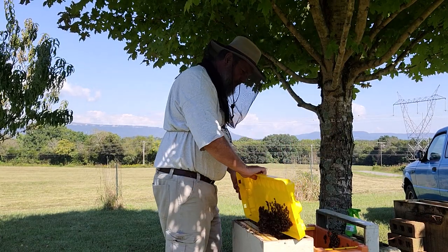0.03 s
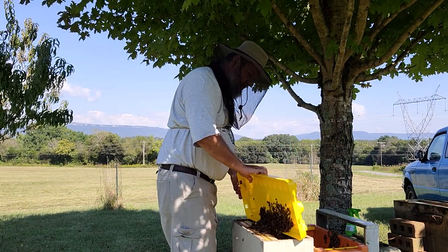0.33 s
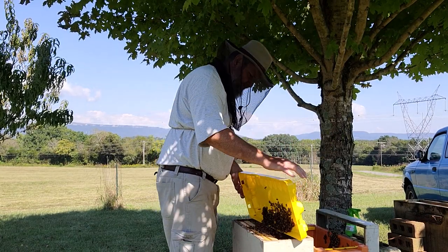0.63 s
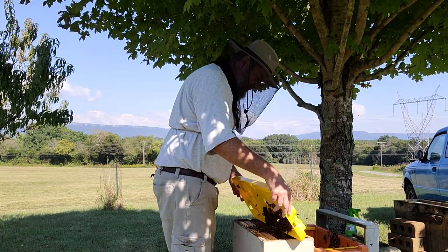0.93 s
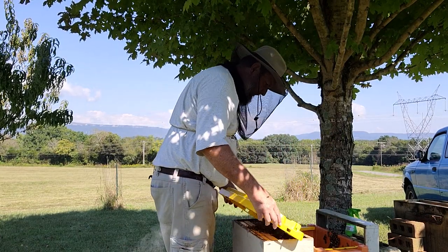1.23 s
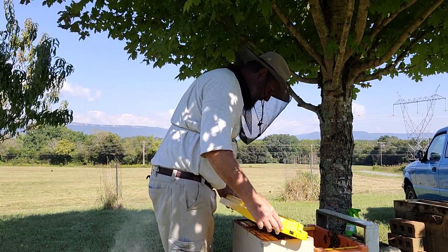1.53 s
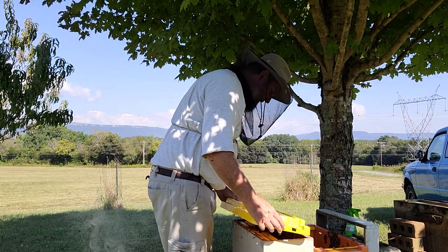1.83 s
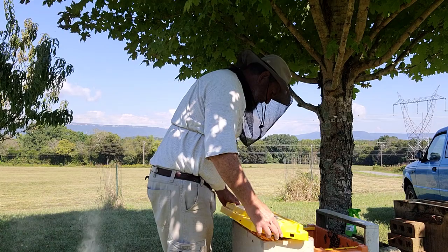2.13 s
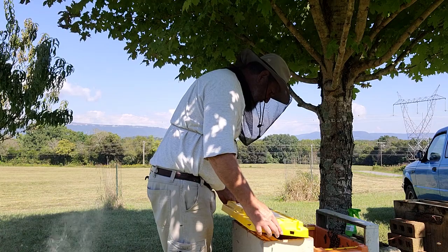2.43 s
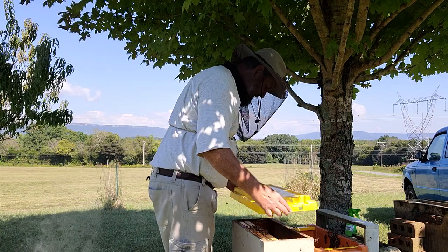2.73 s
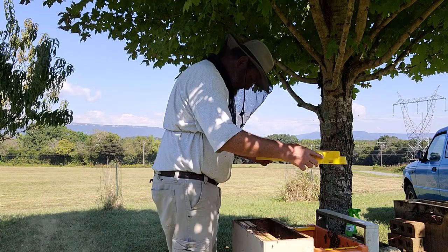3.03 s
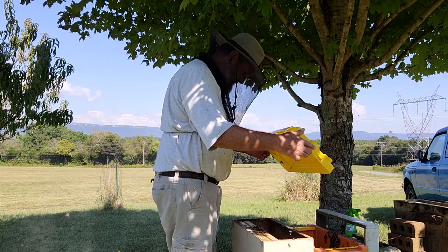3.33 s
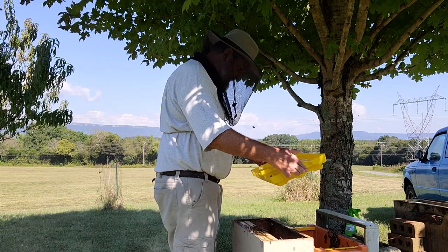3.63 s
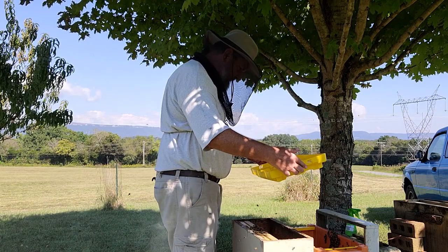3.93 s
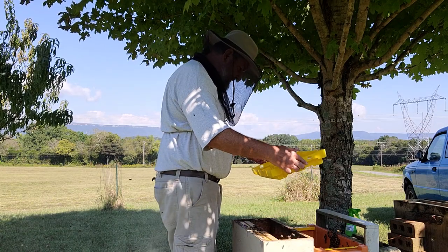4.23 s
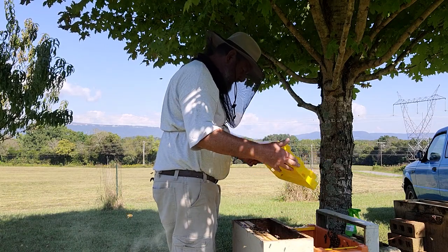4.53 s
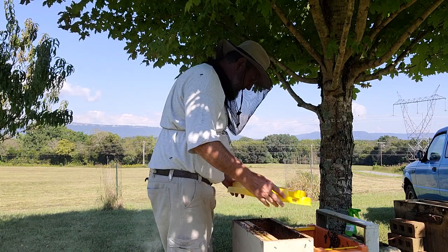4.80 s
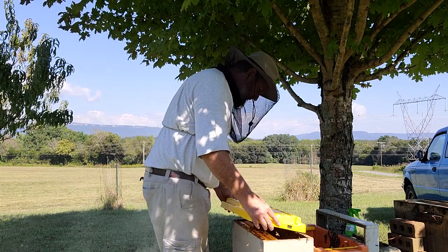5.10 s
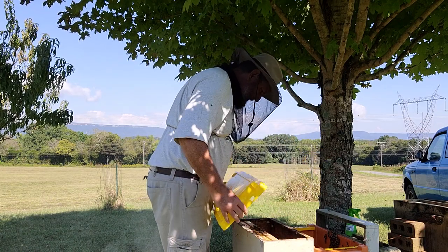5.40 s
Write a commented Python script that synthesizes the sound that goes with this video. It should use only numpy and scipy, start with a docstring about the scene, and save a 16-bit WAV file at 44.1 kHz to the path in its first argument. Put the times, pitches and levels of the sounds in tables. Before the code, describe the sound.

A hand rustles over a plastic lid, which rubs and taps softly on a wooden box close by. Then comes a loud, hollow knock with a brief rattle, a short scrape and a squeak. About three seconds later a second sharp knock lands. Behind it all, in the open air, are faint high insect trills, scattered falling bird chirps and the low throb of a far engine.

```python
"""Under a tree, a far engine throbs and insects trill in the open air from start to end.
First a hand rustles over a plastic lid, which clicks, scuffs and taps on a wooden hive box; birds join in.
Just after 2 s the lid is knocked down to shake off bees: a quick run of hits that rings lid and box.
The rim drags and squeaks once, then come a few more faint chirps and light scuffs.
Just after 5 s the lid is knocked down again, this time on its corner."""
import sys
import numpy as np
from scipy import signal
from scipy.fft import rfft, irfft, next_fast_len
from scipy.io import wavfile

SR = 44100
rng = np.random.default_rng(int(sys.argv[2]) if len(sys.argv) > 2 else 0)


def generate_wav(sig):
    """Save sig (samples, or channels by samples) to the path in sys.argv[1] as 16-bit PCM at SR."""
    pcm = np.round(np.clip(np.atleast_2d(sig).T, -1, 1) * 32767).astype(np.int16)
    wavfile.write(sys.argv[1], SR, pcm)


N = 245195
TIME = np.arange(N) / SR

# the knocks: t/s, force/dB, place (0 rim, 1 corner), edge hardness/Hz, wait until the slap/s,
# snap level/dB, wait from slap to thud/s, thud level/dB, bounce level/dB
KNOCKS = [(2.2302, 0.5, 0.072, 2880, .0081, -29, .0174, -7, -11),
          (5.1674, 0, 0.96, 5200, .0053, -25, 0.00349, -1, -46)]
# the notes lid and box ring at: f/Hz, ring time/s (to fade by 60 dB), rim level/dB, corner level/dB
LID_NOTES = [(93.6, 0.35, -21, -25.5), (115, 0.095, -22.5, -15.5), (154, 0.084, -40, -14),
             (198, 0.079, -20, -18.5), (238.2, 0.132, -23, -13), (274.7, 0.15, -30, -19),
             (311, 0.078, -20.5, -27), (401, 0.1, -27, -27.5), (439.5, 0.084, -29.5, -18),
             (444.2, 0.23, -20, -57), (683, 0.1, -24.5, -32), (734, 0.073, -36.5, -22),
             (918, 0.056, -29, -35), (970, 0.066, -39, -20), (1035, 0.028, -27, -25),
             (1221, 0.041, -21, -22), (1396, 0.073, -26, -35), (1430, 0.026, -39, -47),
             (1768, 0.031, -38, -16.5), (1952, 0.023, -13.5, -61), (2220, 0.061, -61, -16),
             (2350, 0.073, -37, -36), (2613, 0.083, -31, -17.5), (2930, 0.067, -46, -21),
             (3055, 0.065, -36, -30), (3323, 0.026, -36, -14.5), (3427, 0.073, -48, -27),
             (3765, 0.049, -57, -20.5)]
# the crack, a crowd of short notes too close to tell apart: f/Hz, level/dB
CRACK_SHAPE = [(100, -8.5), (300, 6.5), (550, -1), (800, 5), (1500, 1.5), (3300, 2), (4200, -10),
               (5500, -11), (6800, -5.5), (8200, -18), (9600, -24), (12000, -10.5), (15500, -5.5)]
# how long the crack lasts: f/Hz, ring time/s
CRACK_FADE = [(200, 0.18), (1000, 0.094), (3000, 0.05), (7000, 0.13), (15000, 0.055)]
# the lid rubbing on the wood: middle t/s, length/s, level/dB, treble cut-off f/Hz
SCUFFS = [(0.306, .12, -49, 2920), (0.459, 0.28, -57, 2480), (0.595, 0.086, -49, 1510),
          (1.0, .06, -56, 1598), (1.416, .05, -52, 1360), (1.69, 0.19, -53.5, 1900),
          (2.305, .06, -48, 7000), (2.37, .09, -49.5, 2500), (2.6, .05, -55, 2500),
          (3.45, 0.075, -58, 3483), (4.65, 0.038, -54, 7100)]
# light taps as the lid is shifted: t/s, force/dB, treble cut-off f/Hz
TAPS = [(.985, -24, 950), (1, -28.5, 1200), (1.401, -26.5, 1600), (1.42, -25, 1000), (1.619, -24.5, 1180),
        (1.642, -31, 3000), (1.671, -29, 1800), (1.757, -27.5, 1300)]
# the plastic clicking under the hand: t/s, level/dB, middle f/Hz, half width/octaves
CLICKS = [(.1000, -32.5, 3180, 0.87), (1.416, -37, 3400, 0.45)]
# how fast the engine cycles: t/s, f/Hz
ENGINE_RATE = [(0.0, 16.4), (0.59, 16.06), (1.55, 16.9), (2.14, 15.9), (2.63, 16.5), (3.11, 16.7),
               (3.42, 16.65), (5.56, 16.64)]
# the tones in its hum: multiple of the cycle rate, level/dB
ENGINE_TONES = [(2, -58.5), (3, -56), (4, -53.5), (5, -41.5), (6, -50.5), (7, -55.5), (8, -54), (9, -61.5),
                (11, -66), (12, -70.5)]
# steady insects: f/Hz, width/Hz, level/dB, pulse rate/Hz, left minus right/dB
TRILLS = [(6210, 52, -72, 60, -10.5), (6160, 770, -67, 31, -4), (7100, 33, -72, 99, -6),
          (7044, 540, -64, 34, 0.5)]
# insects whose pitch arches in each pulse: top f/Hz, bend/Hz, place of the top (0 to 1), width/Hz,
# level/dB, pulse rate/Hz, shortness of the pulse, left minus right/dB
PULSERS = [(8366, 2600, 0.6, 150, -70, 17.9, 2.5, 13.5), (8000, 2500, 0.4, 130, -69.5, 16.9, 4.5, 11.5),
           (6210, 1600, 0, 200, -74.5, 4.4, 8.7, -12.5)]
# falling bird chirps: t/s, start f/Hz, end f/Hz, level/dB
CHIRPS = [(1.063, 3950, 2560, -62), (1.143, 3600, 2710, -65.5), (1.457, 3400, 2540, -63.5),
          (1.532, 3400, 2380, -62), (1.907, 3500, 2450, -59.5), (1.946, 2950, 2290, -56.5),
          (2.689, 3950, 3140, -52.5), (3.073, 2750, 2180, -62), (3.253, 3050, 2500, -60),
          (4.017, 3400, 2920, -56)]
# high peeps that lead into some chirps: t/s, f/Hz, level/dB
PEEPS = [(1.497, 3620, -60), (1.85, 3560, -59), (1.932, 3850, -60)]
# the low wash of open air: f/Hz, level/dB
WASH_SHAPE = [(20, -18), (33, -2.5), (60, 4), (110, -2.5), (170, -8.5), (260, -12), (450, -14),
              (700, -18.5), (1250, -18.5), (2000, -24.5), (3200, -27), (5000, -30.5), (8500, -27.5),
              (9200, -38.5), (16000, -59)]
# the thin hiss above it: f/Hz, level/dB
HISS_SHAPE = [(9000, -14), (11000, -10), (12300, -3), (15800, -1.5)]
# how alike the wash is in the two ears: f/Hz, likeness (0 unrelated, 1 the same)
EAR_LIKENESS = [(30, 0.51), (90, 0.92), (300, 1), (640, 0.25), (1400, 0.18), (7000, 0.15), (15000, 0)]
# the lean of hive, engine and air to the right: f/Hz, left minus right/dB
BALANCE = [(60, -1.47), (300, -0.5), (2400, -1), (4400, -3.5), (8000, -3), (15000, -7)]


def knocks(seat_s=0.002788, snap_lag_s=0.00035, hop_s=0.042, hop_kept=0.52, hop_loss_db=9.5):
    """The lid lands edge first, slaps flat, takes the weight of the arm and bounces three times."""
    out = np.zeros((2, N))
    for s, force_db, place, edge_hz, slap_s, snap_db, thud_s, thud_db, bounce_db in KNOCKS:
        force, flat_at = amp(force_db), s + slap_s
        touch = contact(place, force_db=0, hard_hz=2 * edge_hz, hold=0.8758, crack_db=-15.5)
        add(out, s, force * touch)
        rest_of_edge = contact(place, force_db=4, hard_hz=edge_hz / 2, hold=0.93, crack_db=-23.5)
        add(out, s + seat_s, force * rest_of_edge)
        slap = contact(place, force_db=0.5, hard_hz=6398, hold=0.9256, crack_db=-15.5)
        add(out, flat_at, force * slap)
        add(out, flat_at + snap_lag_s, force * amp(snap_db) * snap(hz=14600, octaves=0.42))
        thud = contact(place, force_db=thud_db + 2.5, hard_hz=1052, hold=0.39, crack_db=-16)
        add(out, flat_at + thud_s, force * thud)
        hops_s = hop_s * hop_kept ** np.arange(3)  # each hop is shorter and weaker
        for k, lag in enumerate(np.cumsum(hops_s)):
            bounce = contact(place, force_db=bounce_db - 4, hard_hz=948, hold=1.04, crack_db=-10.5)
            add(out, flat_at + lag, force * amp(-k * hop_loss_db) * bounce)
    return out


def contact(place, force_db, hard_hz, hold, crack_db, spread=0.39, tick_s=0.0012):
    """One hit makes a ring and a crack. A harder hit keeps more treble; hold scales the ring times."""
    fade = np.array(CRACK_FADE) * [1, hold]
    side_shape = [(hz, db + 10 * np.log10(hz / 3000)) for hz, db in CRACK_SHAPE]
    middle = fading_noise(CRACK_SHAPE, fade)[0]
    side = spread * fading_noise(side_shape, fade)[0]  # the ears differ more in the treble
    tick = 1 + 0.46 * np.exp(-np.arange(len(middle)) / SR / tick_s)  # the first instant stands out
    crack = amp(crack_db) * tick * np.array([middle + side, middle - side])
    return amp(force_db) * soften(ring(place, hold) + crack, hard_hz)


def ring(place, hold, rise_cycles=0.56):
    """Lid and box ring at their own notes; where they are hit sets how loud each note is."""
    t = np.arange(8192) / SR
    out = np.zeros((2, len(t)))
    for k, (hz, ring_s, rim_db, corner_db) in enumerate(LID_NOTES):
        gain = (-1) ** k * amp(rim_db + place * (corner_db - rim_db))
        swing = (1 - np.exp(-t * hz / rise_cycles)) * fade_out(t, ring_s * hold)
        skew = amp(-17) * hz / 1000 * rng.standard_normal((2, 1))  # high notes reach the ears out of step
        out += gain * swing * np.sin(2 * np.pi * hz * t + skew)
    return out


def snap(hz, octaves, ring_s=0.0072):
    """The plastic snaps: a very short burst of noise around one pitch."""
    t = np.arange(1024) / SR
    noise = rng.standard_normal((2, len(t)))
    band = colour(noise, lambda f: np.exp(-.5 * (np.log2((f + 1) / hz) / octaves) ** 2))
    return unit_level(band) * (1 - np.exp(-t * hz)) * fade_out(t, ring_s)


def taps():
    """Handling the lid makes soft hits on the box and small clicks in the plastic."""
    out = np.zeros((2, N))
    for s, force_db, hard_hz in TAPS:
        add(out, s, contact(place=0.44, force_db=force_db, hard_hz=hard_hz, hold=0.63, crack_db=-16))
    for s, db, hz, octaves in CLICKS:
        add(out, s, amp(db) * snap(hz, octaves))
    return out


def scuffs(slips_per_s=400, box_hz=450, bass_cut_hz=330):
    """Tiny slips of the rim on the wood ring the lid and set the hollow box humming; one drag squeaks."""
    out, t = np.zeros((2, N)), np.arange(8192) / SR
    box_note = amp(3.5) * unit_level(np.sin(2 * np.pi * box_hz * t) * fade_out(t, ring_s=0.2))
    for s, length, db, bright_hz in SCUFFS:
        size = int(length * SR) + 2
        slips = rng.standard_normal(size) * np.hanning(size)
        slips *= 0.13 + (rng.random(size) < slips_per_s / SR)  # a soft rub with sudden catches
        notes = unit_level(ring(place=0, hold=1))
        grit = amp(1) * unit_level(fading_noise(CRACK_SHAPE, CRACK_FADE))
        rub = soften(signal.fftconvolve(slips[None], box_note + notes + grit, axes=1), bright_hz)
        # light slips hardly move the lowest notes
        rub = colour(rub, lambda f: f ** 2 / np.hypot(f ** 2, bass_cut_hz ** 2))
        add(out, s - length / 2, amp(db) * rub / np.sqrt(np.sum(rub ** 2) / size))
    squeak = glide(length_s=.035, start_hz=1760, end_hz=1700, db=-48, rasp=0.019)
    add(out, 2.362, squeak)
    return out


def yard_echo(x):
    """Trunk, leaves and ground throw a little of the sound back."""
    shape_hz_db = [(100, 1), (400, -21), (3500, 12), (9000, -13)]
    fade_hz_s = [(200, 0.44), (3000, 0.34), (10000, 0.22)]
    return with_echo(x, fading_noise(shape_hz_db, fade_hz_s, size=SR // 2), db=-32)


def engine(uneven=0.15, waver=0.2, wander_cycles=0.03):
    """A far idling engine fires unevenly, and each of its tones wavers on its way through the air."""
    cycles = np.cumsum(curve(ENGINE_RATE)) / SR
    hum = np.zeros(N)
    for multiple, db in ENGINE_TONES:
        gain = np.sqrt(2) * amp(db) * (1 + waver * drift(7.5))
        phase = multiple * cycles + rng.random() + wander_cycles * drift(0.62)
        hum += gain * np.sin(2 * np.pi * phase)
    return hum * (1 + uneven * drift(23))


def insects(throb=0.42, unsteady_hz=0.4):
    """Insects sing with wing strokes: fast ones blur into trills, slow ones sweep in pitch."""
    out = np.zeros((2, N))
    for hz, width_hz, db, rate, pan_db in TRILLS:
        strokes = 1 + throb * np.sin(2 * np.pi * rate * TIME + drift(2.5))
        out += ear_gains(db, pan_db) * unit_level(strokes * fuzzy_tone(hz, width_hz))
    for top_hz, bend_hz, top_at, width_hz, db, rate, shortness, pan_db in PULSERS:
        stroke = (np.cumsum(rate + unsteady_hz * drift(1)) / SR + rng.random()) % 1  # 0 to 1 each pulse
        pitch_hz = top_hz - bend_hz * (stroke - top_at) ** 2
        song = fuzzy_tone(pitch_hz, width_hz) * np.sin(np.pi * stroke) ** shortness
        out += ear_gains(db, pan_db) * unit_level(song)
    return out


def birds(chirp_s=0.05, peep_s=0.055, echo_s=0.16):
    """Birds give short sliding whistles, smeared by the leaves."""
    out = np.zeros((2, N))
    for s, start_hz, end_hz, db in CHIRPS:
        add(out, s, glide(chirp_s, start_hz, end_hz, db))
    for s, hz, db in PEEPS:
        add(out, s, glide(peep_s, hz, hz * 1.02, db))
    leaves = fading_noise([(3000, 0)], [(3000, echo_s)])
    return with_echo(out, leaves, db=-2)


def air_and_rustle(wash_db_per_s=-0.1947, hiss_db_per_s=-0.63):
    """A low wash and thin hiss of open air; early on, a hand sliding over the lid adds a brief rustle."""
    left, other = rng.standard_normal((2, N))
    alike = lambda f: read(EAR_LIKENESS, f)
    right = colour(left, alike) + colour(other, lambda f: np.sqrt(1 - alike(f) ** 2))
    wash = shaped(np.array([left, right]), WASH_SHAPE)
    hiss = shaped(rng.standard_normal((2, N)), HISS_SHAPE)
    hand_slide = np.exp(-((TIME - 0.37) / 0.33) ** 2)
    wash_db = -48 + wash_db_per_s * TIME + 1.8 * hand_slide + 0.03 * drift(3.5)
    hiss_db = -64.5 + hiss_db_per_s * TIME + 7.4 * hand_slide
    return wash * amp(wash_db) + hiss * amp(hiss_db)


def glide(length_s, start_hz, end_hz, db, rasp=0.04):
    """A short tone that swells and fades while its pitch slides and quavers."""
    hz = np.geomspace(start_hz, end_hz, int(length_s * SR))
    hz *= 1 + rasp * unit_level(soften(rng.standard_normal(len(hz)), 400))
    return amp(db) * np.sqrt(2) * np.hanning(len(hz)) * np.sin(2 * np.pi * np.cumsum(hz) / SR)


def fuzzy_tone(hz, width_hz):
    """A narrow band of noise that follows a pitch, different in each ear."""
    tone = np.exp(2j * np.pi * np.cumsum(hz * np.ones(N)) / SR)
    smoothing = np.exp(-np.pi * width_hz / SR)
    noise = rng.standard_normal((2, N)) + 1j * rng.standard_normal((2, N))
    flutter = signal.lfilter([1], np.poly([smoothing, smoothing]), noise)
    return unit_level((tone * flutter).real)


def fading_noise(shape, ring_times, size=8192):
    """Noise for two ears in which each band of pitch fades at its own speed."""
    t, centres = np.arange(size) / SR, np.geomspace(60, SR / 2, num=9)
    noise = shaped(rng.standard_normal((2, size)), shape)
    bands = [colour(noise, lambda f: read(np.c_[centres, centres == hz], f)) for hz in centres]
    return sum(band * fade_out(t, read(ring_times, hz)) for band, hz in zip(bands, centres))


def with_echo(x, tail, db):
    """A sound plus its echo, which dies away like the given tail."""
    return x + amp(db) * signal.fftconvolve(x, tail / np.linalg.norm(tail[0]), axes=1)[:, :N]


def fade_out(t, ring_s):
    """A fade that drops 60 dB in ring_s seconds."""
    return np.exp(-np.log(1000) * t / ring_s)


def drift(hz):
    """A random wobble, up to about the given rate."""
    return unit_level(colour(rng.standard_normal(N), lambda f: np.exp(-.5 * (f / hz) ** 2)))


def shaped(noise, shape):
    """Gives noise the bass and treble of a table, at level 1."""
    return unit_level(colour(noise, lambda f: amp(read(shape, f))))


def colour(x, gain):
    """Turns each frequency f up or down by gain(f)."""
    size = next_fast_len(x.shape[-1])
    spectrum = rfft(x, size) * gain(np.fft.rfftfreq(size, 1 / SR))
    return irfft(spectrum, size)[..., :x.shape[-1]]


def soften(x, hz):
    """Dulls the treble above hz."""
    return signal.sosfilt(signal.butter(2, hz, fs=SR, output="sos"), x)


def amp(db):
    """Turns decibels into a gain."""
    return 10 ** (np.asarray(db) / 20)


def ear_gains(db, pan_db):
    """Left and right gains, pan_db apart."""
    return amp([[db + pan_db / 2], [db - pan_db / 2]])


def unit_level(x):
    """Scales a sound to an average (rms) level of 1."""
    return x / np.sqrt(np.mean(np.abs(x) ** 2) + 1e-20)


def read(table, hz):
    """Looks up a frequency in a table, blending between rows by pitch."""
    f, value = np.transpose(table)
    return np.interp(np.log(hz + 1), np.log(f + 1), value)


def curve(table):
    """The value of a time table at every sample."""
    return np.interp(TIME, *np.transpose(table))


def add(mix, s, sound):
    """Mixes a sound in at s seconds."""
    part = mix[..., round(s * SR):][..., :sound.shape[-1]]
    part += sound[..., :part.shape[-1]]


def scene():
    """Hive, engine and air lie a little to the right; insects and birds are added around them."""
    left, right = yard_echo(knocks() + taps() + scuffs()) + engine() + air_and_rustle()
    late_left = np.r_[0, 0, left[:-2]]  # the sound reaches the far ear two samples later
    leaning = colour(np.array([late_left, right]), lambda f: amp(np.outer([.5, -.5], read(BALANCE, f))))
    return leaning + insects() + birds()


def record(dry):
    """Cuts off the highest treble, above 15900 Hz."""
    treble_cut = signal.firwin(511, 15900, window=("kaiser", 9), fs=SR)
    return signal.oaconvolve(dry, treble_cut[None], "same")


dry = scene()
out = record(dry)
generate_wav(out)
```